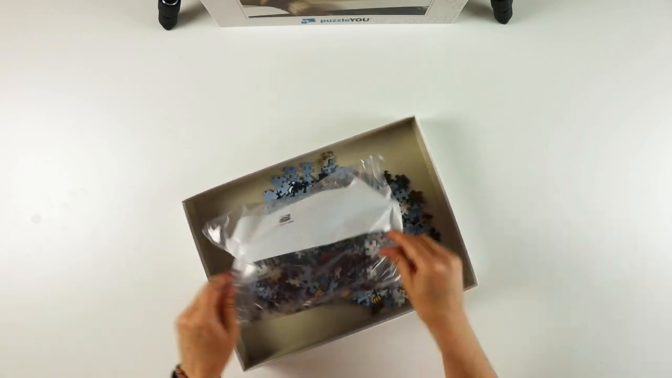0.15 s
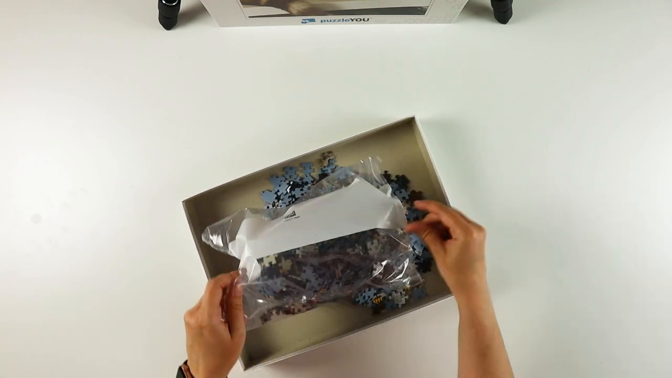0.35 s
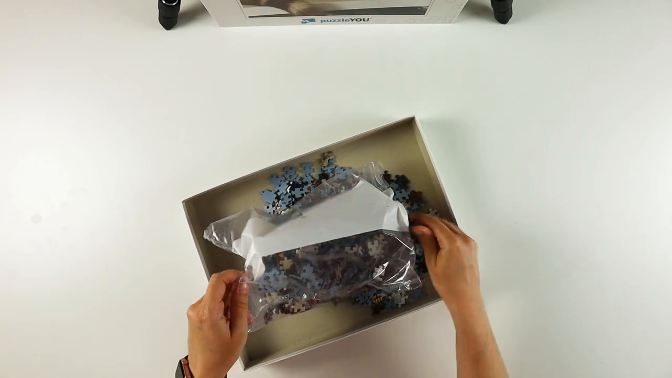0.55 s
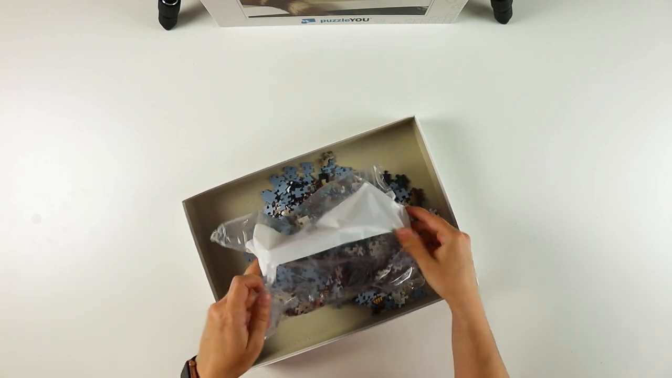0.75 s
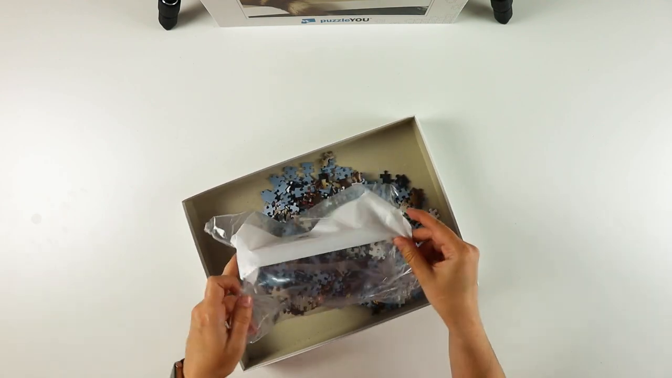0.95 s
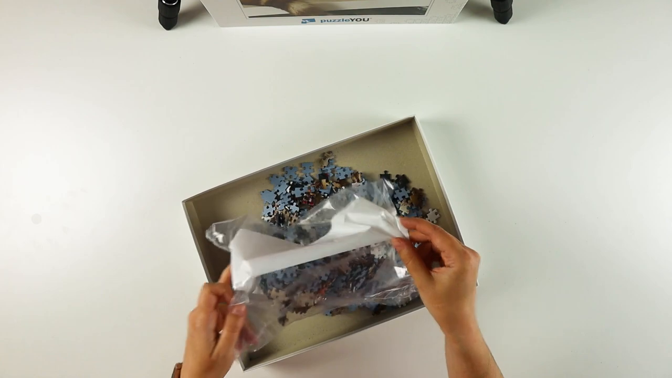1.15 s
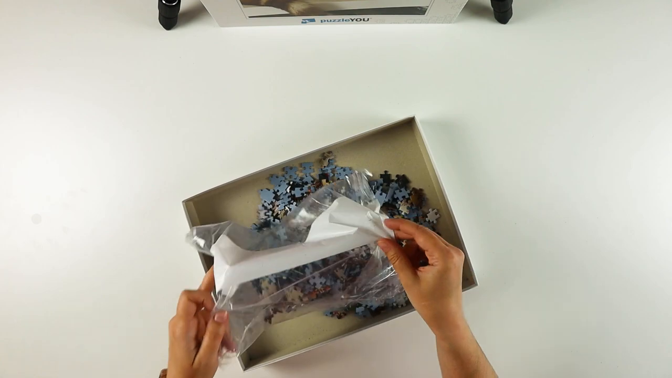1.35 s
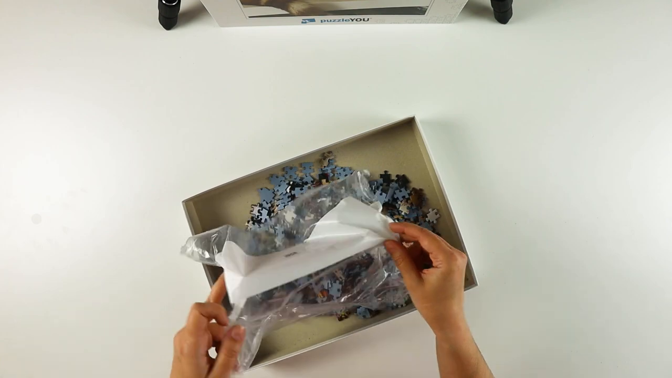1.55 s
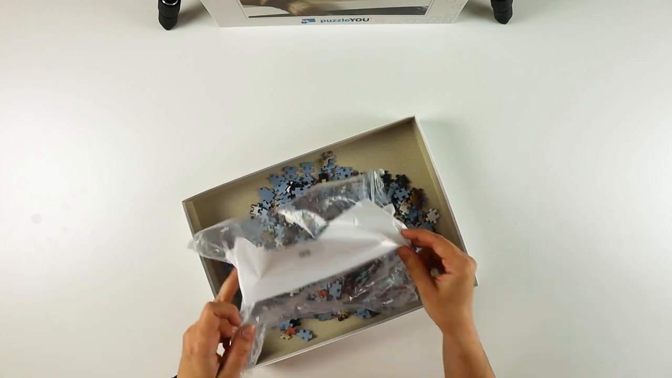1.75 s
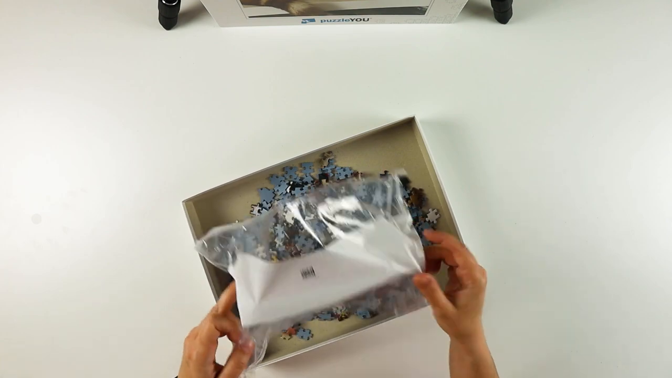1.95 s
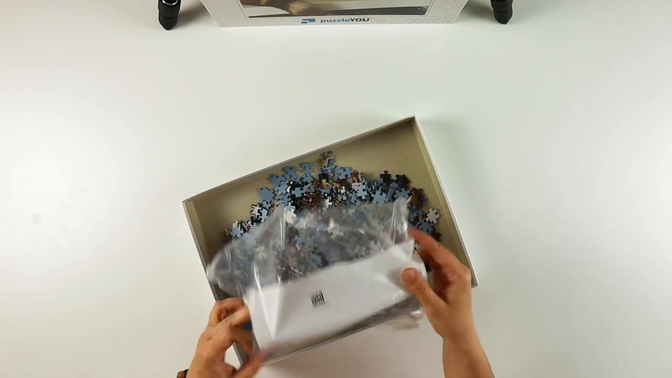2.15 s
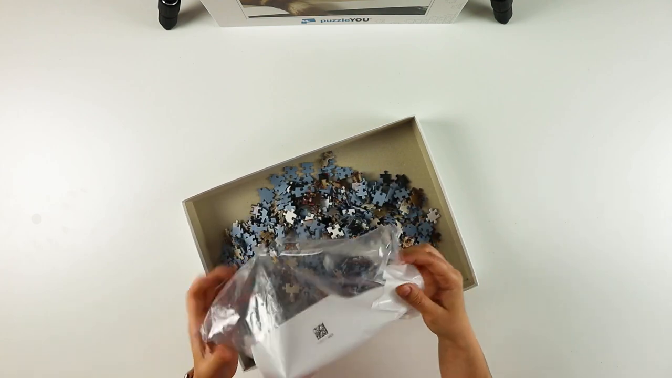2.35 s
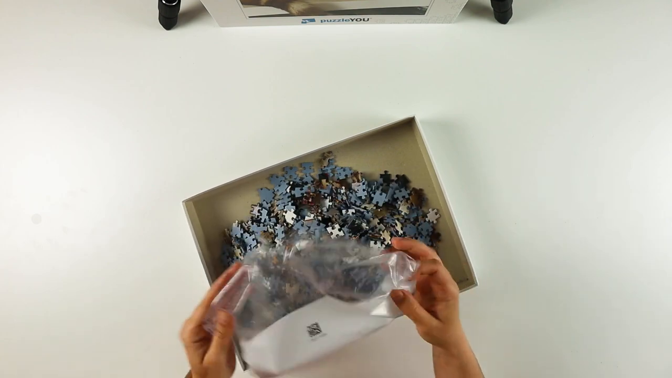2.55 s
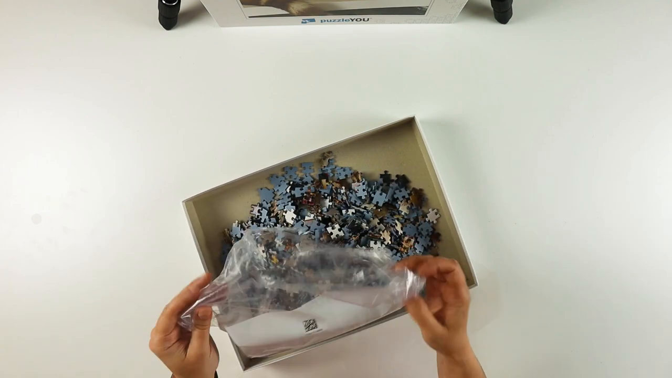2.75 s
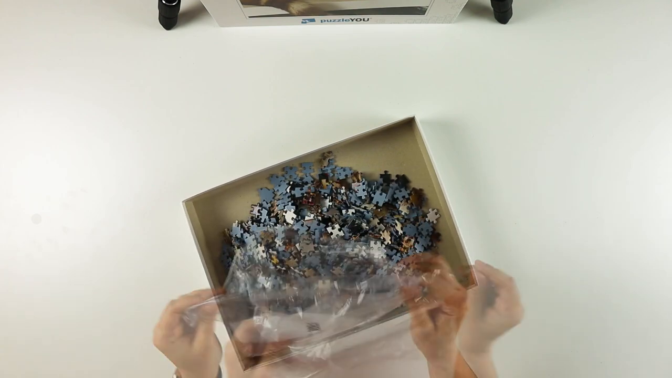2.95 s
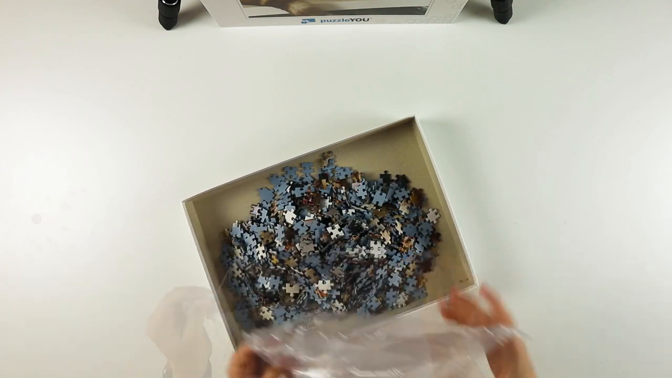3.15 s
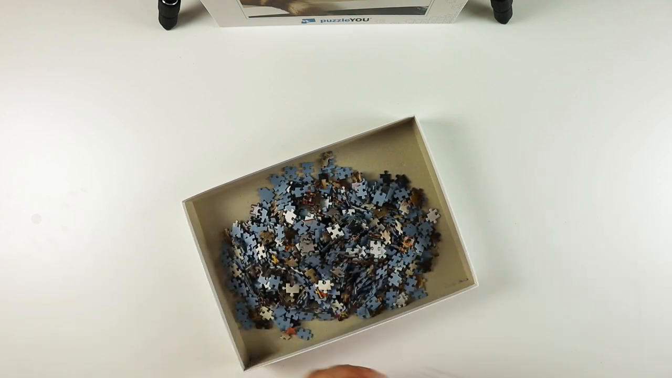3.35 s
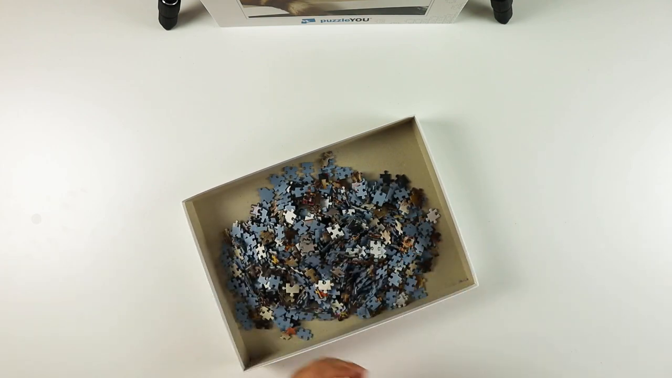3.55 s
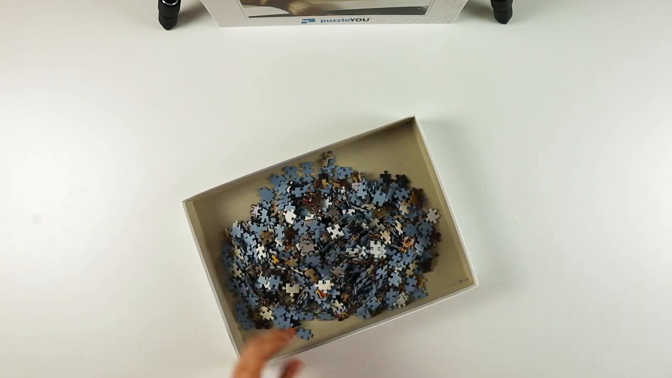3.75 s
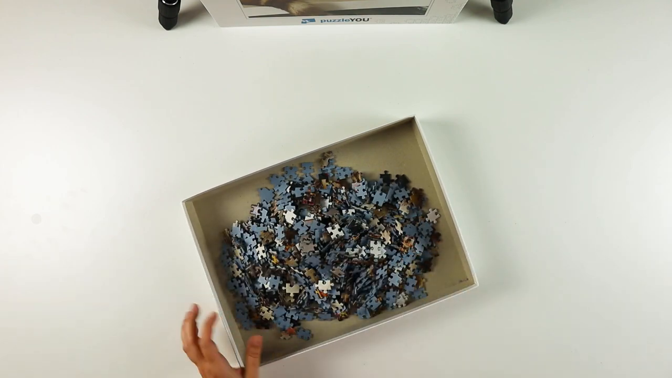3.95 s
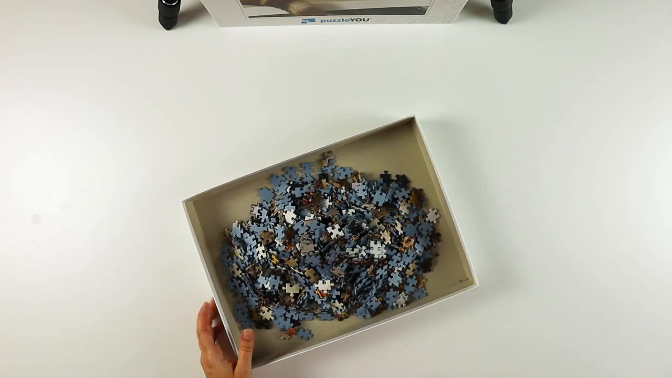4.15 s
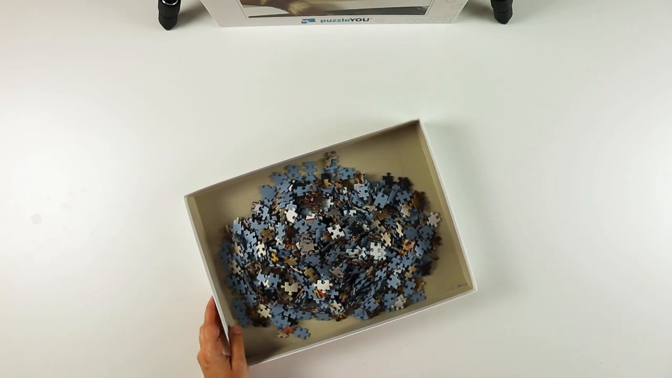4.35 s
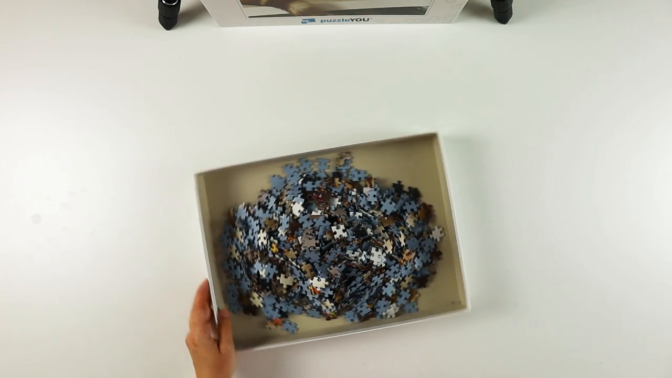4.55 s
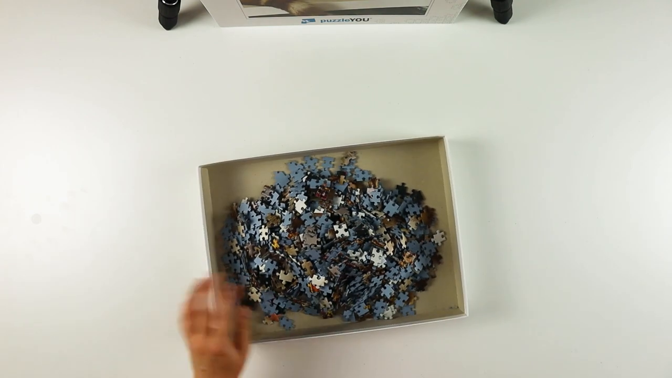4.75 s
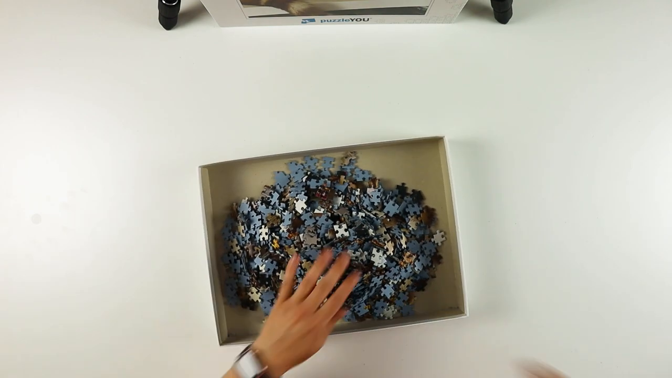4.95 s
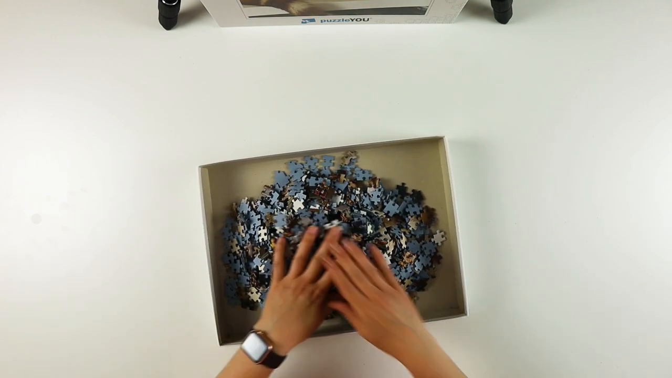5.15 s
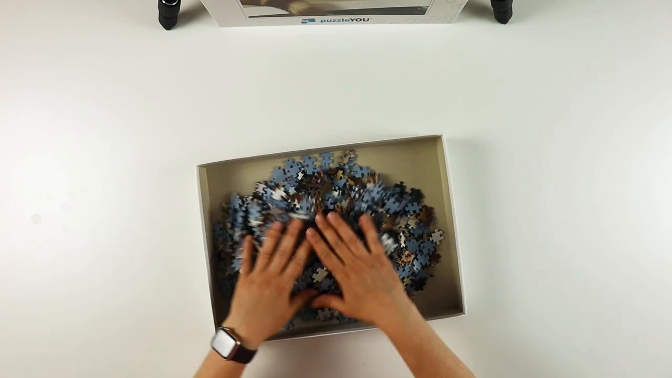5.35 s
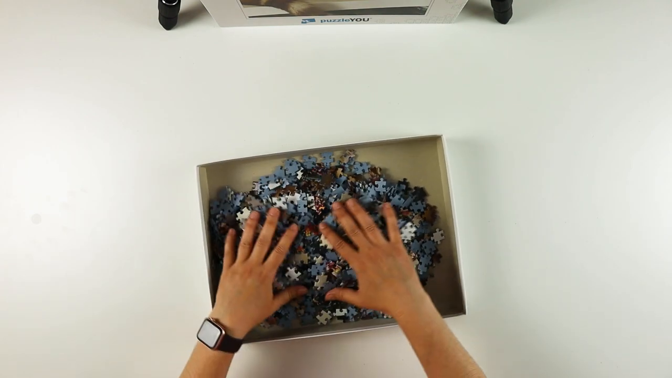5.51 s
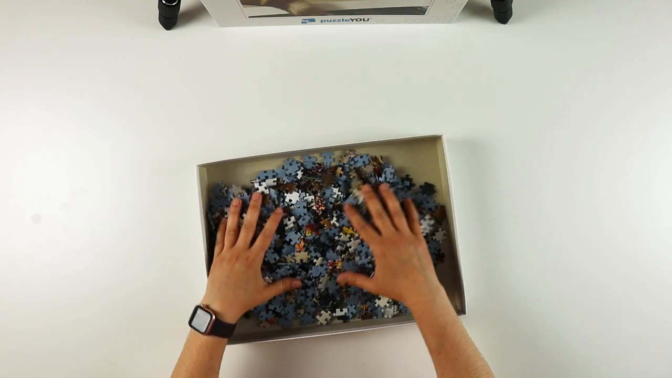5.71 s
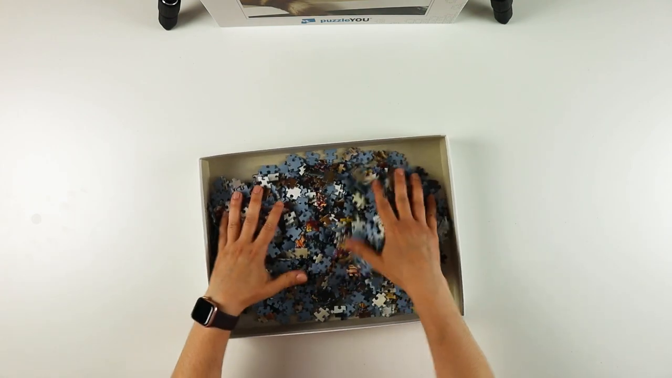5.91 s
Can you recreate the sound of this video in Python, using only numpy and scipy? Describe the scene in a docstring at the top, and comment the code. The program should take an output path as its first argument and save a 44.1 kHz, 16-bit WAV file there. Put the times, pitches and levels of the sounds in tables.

```python
"""Cardboard puzzle pieces are shaken out of a plastic bag into their box on a table, in a small room.
The empty bag is crumpled and put aside, a hand nudges the box and slides it round, then both hands
spread the heap over the drumming box floor. Pieces are dense clouds of tiny rings with ringing landings
on top, film is coloured crackle with separate snaps, and the box is a bank of resonances."""
import sys
import numpy as np
from scipy import signal
from scipy.fft import rfft, irfft, next_fast_len
from scipy.io import wavfile

SR = 44100
rng = np.random.default_rng(int(sys.argv[2]) if len(sys.argv) > 2 else 0)


def digitize_waveform(pressure):
    """Quantize a signal to 16-bit integers and store it at the path in sys.argv[1].

    Rows of a 2-D input are taken as channels; values are limited to [-1, 1].
    """
    field = np.atleast_2d(pressure).T
    bounded = np.clip(field, -1, 1)
    quanta = np.round(bounded * 32767).astype(np.int16)
    wavfile.write(sys.argv[1], SR, quanta)


N = 263661  # samples, about 6 s

# Levels in these tables are taken before the trim of each layer in the mix.

# The box is nudged, then slid round on the table. Each row: time in seconds, scrape level in dB.
SLIDE_SPEED = [(4.05, -55), (4.33, -59), (4.36, -49.5), (4.58, -47), (4.63, -28.5), (4.77, -30), (4.9, -57),
               (4.96, -82)]
# Hands spread the heap. Each row: time in seconds, clatter level in dB, pressure on the box floor in dB,
# scraping on the box floor in dB.
SPREAD_MOVES = [(5.168, -58, -53, -70), (5.176, -38, -47, -57), (5.194, -31, -35.5, -42),
                (5.324, -31.5, -25.5, -36), (5.356, -26.5, -22.5, -34), (5.504, -19.5, -25.5, -20.5),
                (5.52, -25.5, -30, -18.5), (5.652, -32, -29.5, -21), (5.822, -26, -27, -28),
                (5.902, -26.5, -30, -23), (5.96, -30.5, -29.5, -29)]
# The biggest creases of the film snap through. Each row: time in seconds, peak in dB, treble lift in dB.
BIG_SNAPS = [(0.1623, -10.5, 6), (0.2496, -11.5, -7), (0.3263, -24, 8), (0.4872, -17, 3),
             (0.5747, -14.5, -7), (0.6386, -15, 5), (0.7426, -15.5, -3), (0.831, -17.5, 3),
             (0.906, -13.5, 8), (0.9392, -15, 8), (1.0077, -9.5, -0.5), (1.2028, -10.5, 10),
             (1.213, -10.5, 2), (1.3124, -14.5, -1), (1.3798, -11, 8), (1.859, -14.5, 6),
             (2.0814, -26.5, -3), (2.3174, -16, 20), (2.3326, -4.5, -0.5), (2.3593, -12, -7),
             (2.5025, -22.5, -1), (2.638, -12, -4), (2.7034, -10, -15), (2.7363, -9, 5), (2.7938, -4.5, -6),
             (3.0869, -12, 10), (3.092, -13, 12), (3.1473, -16, 0), (3.1569, -13, 9), (3.3158, -23.5, -1),
             (3.3747, -13, 3), (3.4032, -11, -3), (3.4474, -6, -10), (3.489, -11, 2), (3.6638, -30.5, -8),
             (3.7836, -30, -11), (3.8172, -27.5, -1), (3.9496, -33, -14), (4.0707, -24.5, 3),
             (4.1704, -24.5, 0), (4.389, -27.5, -22)]
# The hardest landings of one piece on another. Each row: time in seconds, peak in dB,
# tick over the ring in dB, ring pitch in Hz.
HARD_LANDINGS = [(0.0095, -9, -7, 2650), (0.2162, -13.5, -6, 4800), (0.33, -9.5, -1, 2510),
                 (0.4007, -14.5, 3, 3380), (0.7151, -14.5, -10, 2860), (0.7653, -15.5, -25, 3290),
                 (0.876, -12, -8, 2290), (0.8837, -8, -18, 4430), (0.9676, -7.5, -14.5, 3300),
                 (1.3141, -10, -4.5, 4500), (1.5477, -10, -10, 4520), (1.5652, -7.5, -16, 3860),
                 (1.5726, -7, -20, 3370), (1.5793, -4.5, -8, 3480), (1.6442, -6, -17, 3600),
                 (1.6496, -5.5, -11, 3730), (1.6676, -6.5, -29, 3480), (1.7201, -6.5, -17, 3800),
                 (1.773, -11, -11, 3650), (4.7637, -12, -3, 4080), (5.1947, -14, 5, 3620),
                 (5.2642, -12, -4, 3700), (5.4389, -20, -2, 4260), (5.4476, -14, -9, 4530),
                 (5.5253, -1.5, -27, 2250), (5.6108, -15.5, 8, 5450), (5.8148, -4.5, -5.5, 4820),
                 (5.8949, -9.5, -10, 3800)]
# Knocks on the box. Each row: time in seconds, peak in dB, most excited frequency in Hz.
BOX_KNOCKS = [(0.87, -19, 1140), (0.883, -16, 1100), (1.312, -19.5, 1780), (1.393, -26, 713),
              (1.572, -14, 1230), (1.692, -13, 1230), (1.734, -15.5, 1070), (1.78, -22, 1090),
              (1.823, -16, 1050), (4.052, -35.5, 171), (4.068, -40.5, 253), (4.191, -38, 170),
              (5.403, -14, 1010), (5.524, -13.5, 730), (5.587, -5.5, 1200), (5.845, -16.5, 1410),
              (5.973, -5, 1110)]
# Modes of the box. Each row: frequency in Hz, width in Hz, relative level in dB.
BOX_MODES = [(149, 33, 1.5), (236, 20, -2), (320, 16.6, 3.5), (418.8, 4.3, 10.5), (497, 16, -3.5),
             (703, 12.8, 3.5), (1035, 39, -4), (1100, 21, -4), (1170, 21, -5), (1238, 40, -8.5),
             (1424, 25, -4.5), (1780, 27, 0.5), (2210, 170, -5.5)]
# Modes of the box floor drumming on the table. Each row: frequency in Hz, width in Hz, relative level in dB.
DRUM_MODES = [(33.3, 13, -9), (77.6, 6.8, 2.5), (140, 38, -7), (199, 60, -12.5), (321, 29, -9)]

# Spectra of the tumbling pieces, the rustling film, the film laid aside, a sharp crease, the box bottom
# on the table, the heap under the hands and the room air.
# Each row: frequency in Hz, relative level in dB per Hz.
TUMBLE_SPECTRUM = [(25, -10), (60, 0.5), (135, -2), (220, 0), (410, 2), (750, 1), (1400, 3), (2700, 1.5),
                   (3400, -0.5), (4600, -3), (6800, -14), (16000, -36)]
FILM_SPECTRUM = [(40, -18), (80, -6), (190, -6), (320, 1.5), (450, 4), (700, -3), (1900, 1), (3200, -1.5),
                 (4400, -2), (6600, -13), (16000, -28.5)]
FAR_FILM_SPECTRUM = [(100, -8), (250, -6), (1300, -3.5), (3000, -5), (4500, -2.5), (7000, -11),
                     (16000, -32.5)]
CREASE_SPECTRUM = [(200, -13.5), (1200, 0), (2800, -6), (4600, 5), (6500, -3.5), (10000, -8), (16000, -17)]
SCRAPE_SPECTRUM = [(30, -18), (80, -5), (160, 1.5), (420, -3), (600, -4), (1100, -2.5), (3000, -7.5),
                   (4600, -6), (7000, -16.5), (16000, -28)]
HEAP_SPECTRUM = [(100, -26), (200, 2), (350, -2.5), (600, -5.5), (1300, -6.5), (2200, -6), (3000, -8),
                 (4600, -6.5), (6300, -14.5), (7800, -15), (8600, -15), (9800, -21), (13000, -24),
                 (16000, -30)]
AIR_SPECTRUM = [(25, -5.5), (45, -2), (85, -5.5), (135, -3.5), (185, -6), (225, -4), (290, -15.5),
                (1200, -15), (2300, -22), (4300, -18.5), (7000, -31), (16000, -33)]
# Decay of the room. Each row: frequency in Hz, time to fall by 60 dB in seconds.
ROOM_DECAY = [(150, 0.45), (1000, 0.27), (4500, 0.084), (14000, 0.084)]

# Each shake of the bag lets a batch of pieces slump out. Each row: start in seconds, length in seconds,
# clatter level in dB, film crinkle level in dB.
BAG_SHAKES = [(0.0, 0.011, -27.5, -32), (0.122, 0.18, -27.5, -37.5), (0.4, 0.084, -29.5, -41),
              (0.57, 0.035, -36, -39), (0.706, 0.13, -33.5, -43), (0.865, 0.031, -20.5, -42),
              (0.958, .05, -30.5, -34.5), (1.085, 0.085, -31, -38), (1.182, 0.027, -24, -49),
              (1.383, 0.063, -27.5, -55), (1.532, 0.34, -27.5, -59), (2.082, 0.0082, -44, -62)]
# Between shakes pieces keep trickling until the bag is empty. Each row: time in seconds, clatter level in dB.
PIECE_TRICKLE = [(0, -29.5), (.68, -40), (1.25, -32.5), (1.87, -36), (2.0, -52), (2.25, -50.5), (2.3, -85)]
# Each squeeze crumples the empty bag. Each row: start in seconds, length in seconds, rustle level in dB,
# swell over the length in dB, crinkle level in dB.
BAG_SQUEEZES = [(2.244, 0.14, -32, 0.5, -46), (2.488, 0.072, -32.5, 0, -57),
                (2.583, 0.22, -31.5, 10.5, -43), (2.872, 0.085, -36.5, -1, -47.5),
                (3.023, 0.067, -20.5, -1, -29), (3.105, 0.087, -28, 1, -31.5), (3.32, .14, -28, 5.5, -32.5),
                (3.482, 0.074, -35, -4.5, -42)]
# The bag, laid aside, unfolds in fits. Each row: start in seconds, length in seconds, rustle level in dB,
# swell over the length in dB.
BAG_UNFOLDS = [(3.66, 0.1, -46, 12.5), (3.815, 0.022, -42, -1), (3.948, 0.036, -50.5, -1),
               (4.068, 0.024, -37.5, -0.5), (4.168, 0.032, -41.5, 0), (4.24, 0.059, -50, 1.5),
               (4.37, 0.03, -44.5, 2.5)]

SHAKE_ATTACK_S, SHAKE_FALL_DB_PER_S = 0.0081, 202
SQUEEZE_ATTACK_S, SQUEEZE_FALL_DB_PER_S = 0.025, 237
UNFOLD_ATTACK_S, UNFOLD_FALL_DB_PER_S = 0.003, 223
# lesser creases snap by chance: their rate, peak over the crinkle, scatter and treble lift
SMALL_SNAPS_PER_S, SMALL_SNAP_DB, SMALL_SNAP_SPREAD_DB, SMALL_SNAP_TREBLE_DB = 30, 14.5, 3, -1.5
# the last pieces pelt the heap: start, length and rate; then the peak, scatter, tick and ring of the landings
PELT_START_S, PELT_LENGTH_S, PELTS_PER_S = 1.56, .21, 120
PELT_DB, PELT_SPREAD_DB, PELT_TICK_DB, PELT_HZ = -15.5, 0.5, -20, 3800
# pieces flicked over by the fingers: their rate, peak over the clatter, scatter, tick and central ring
FLICKS_PER_S, FLICK_DB, FLICK_SPREAD_DB, FLICK_TICK_DB, FLICK_HZ = 22, 5.5, 3.5, -5, 3830
PITCH_SCATTER = 0.093  # share by which the ring of a lesser landing differs from piece to piece
TOP_HZ = 16000


def amp(db):
    """Decibels to gain."""
    return 10 ** (np.asarray(db) / 20)


def unit(x):
    """Scale to rms 1."""
    return x / np.sqrt(np.mean(x ** 2) + 1e-20)


def along(points, hz):
    """Read (Hz, value) points on a log frequency axis."""
    f, v = np.transpose(points)
    return np.interp(np.log(hz + 1), np.log(f + 1), v)


def gains(rows):
    """A gain per sample for each dB column, near silent before the first row and held after the last."""
    s, *columns = np.transpose(rows)
    return [amp(np.interp(np.arange(N) / SR, s, column, left=-120)) for column in columns]


def filtered(x, response):
    """Shape x by a complex response of frequency, with padding for the ringing."""
    m = 2 * next_fast_len(len(x) // 2 + 4096)
    return irfft(rfft(x, m) * response(np.fft.rfftfreq(m, 1 / SR)), m)[:len(x)]


def causal(gain):
    """The minimum-phase response with this gain: it rings only after a blow."""
    cepstrum = irfft(np.log(np.maximum(gain, 1e-6)))
    half = len(cepstrum) // 2
    cepstrum[1:half] *= 2
    cepstrum[half + 1:] = 0
    return np.exp(rfft(cepstrum))


def coloured(x, spectrum):
    """Colour x with a spectrum, at rms 1."""
    return unit(filtered(x, lambda hz: causal(amp(along(spectrum, hz)))))


def resonate(x, modes):
    """Pass x through a set of resonances of alternating sign, at rms 1."""
    def response(f):
        total = 0
        for k, (centre, width, db) in enumerate(modes):
            band = 1j * f * width
            total = total + (-1) ** k * amp(db) * band / (centre * centre - f * f + band)
        return total
    return unit(filtered(x, response))


def box(x, centre_hz, focus_db, damping=1):
    """The box rings most near centre_hz; focus_db is the loss an octave away, damping widens its modes."""
    return resonate(x, [(hz, width * damping, db - focus_db * abs(np.log2(hz / centre_hz)))
                        for hz, width, db in BOX_MODES])


def add(track, s, sound, db):
    """Place a sound at time s, its six tallest samples averaging db."""
    part = track[max(round(s * SR), 0):][:len(sound)]
    crest = np.sort(np.abs(sound))[-6:].mean()
    part += amp(db) * sound[:len(part)] / crest


def bursts(rate, spread_db, t60):
    """An envelope that jumps at random moments by random amounts and dies away, at rms 1."""
    chance, size = rng.random(N), rng.standard_normal(N)
    energy = (chance < rate / SR) * amp(spread_db * np.clip(size, -2, 2)) ** 2
    decay = amp(-60 / (t60 * SR)) ** 2
    return unit(np.sqrt(signal.lfilter([1], [1, -decay], energy)))


def surges(share, rate, spread_db, t60):
    """A steady envelope in which bursts carry this share of the power."""
    return np.sqrt(1 - share + share * bursts(rate, spread_db, t60) ** 2)


def crackle(rate, spread_db, t60):
    """White noise bursts of random sizes, at rms 1."""
    return bursts(rate, spread_db, t60) * rng.standard_normal(N)


def clatter(rate, spread_db, ring, rub_db):
    """Dense cardboard contacts, each ringing briefly at eight pitches of its own; white overall."""
    draw = rng.random((int(rate * N / SR), 10))
    t = np.arange(200) / SR
    size = amp(-spread_db * np.log(np.maximum(draw[:, 1:2], .05)))
    # one random pitch in each 1900 Hz band
    hz = 700 + 1900 * (np.arange(8) + draw[:, 2:])[..., None]
    sign = (-1) ** np.arange(8)[:, None]
    rings = np.exp(-t / ring) * np.sin(2 * np.pi * hz * t) * sign
    where = (draw[:, :1] * N).astype(int) + np.arange(len(t))
    grains = unit(np.bincount(where.ravel(), (size * rings.sum(1)).ravel(), N)[:N])
    # between contacts the rough faces rub on each other
    return grains + amp(rub_db) * crackle(2 * rate, spread_db, t60=0.017)


def strokes(rows, attack_s, fall_db_per_s):
    """The gain of (s, length s, dB, swell dB) movements: each starts quickly, holds or swells, then dies away."""
    power = np.zeros(N)
    for s, length, db, swell_db in rows:
        age = np.arange(N) / SR - s
        level = db + swell_db * np.clip(age / length, 0, 1) - fall_db_per_s * np.maximum(age - length, 0)
        power += (np.clip(age / attack_s, 0, 1) * amp(level)) ** 2
    return np.sqrt(power)


def scattered(gain, rate, over_db, spread_db):
    """Chance contacts while something moves, their peaks following its gain: rows (s, peak dB)."""
    slots = np.arange(int(rate * N / SR))
    draw = rng.random((len(slots), 2))
    times = (slots + draw[:, 0]) / rate
    # an even scatter with spread_db as its standard deviation
    scatter_db = spread_db * np.sqrt(3) * (2 * draw[:, 1] - 1)
    peaks = gain[(times * SR).astype(int)] * amp(over_db + scatter_db)
    return [(s, 20 * np.log10(peak)) for s, peak in zip(times, peaks) if peak > .003]


def air():
    """The quiet air of the room is steady coloured noise."""
    return amp(-58.0) * coloured(rng.standard_normal(N), AIR_SPECTRUM)


def room(x):
    """The walls answer after 5 ms with a short noise tail, dying fastest in the treble."""
    hz, t, z = signal.stft(rng.standard_normal(SR // 2), SR, nperseg=256)
    decay = amp(-60 * t / along(ROOM_DECAY, hz)[:, None])
    tail = signal.istft(z * decay, SR, nperseg=256)[1]
    return signal.fftconvolve(np.pad(x, (SR // 200, 0)), tail / np.linalg.norm(tail))[:N]


def slide():
    """The box bottom sticks and slips over the table, damped by the hand that holds it."""
    speed, = gains(SLIDE_SPEED)
    s = np.arange(N) / SR
    rub = coloured(crackle(rate=2800, spread_db=0.5, t60=0.0073), SCRAPE_SPECTRUM)
    # as the box turns, the rubbing spot moves and wakes lower modes
    turned = np.interp(s, [4.68, 4.745], [0, 1])
    judder = crackle(rate=1000, spread_db=3.5, t60=0.0037)
    high = box(judder, centre_hz=835, focus_db=15, damping=2.3)
    low = box(judder, centre_hz=430, focus_db=19, damping=2.9)
    card = np.sqrt(1 - turned) * high + np.sqrt(turned) * low
    # the card groans most in the fast middle of the turn
    groan = amp(-11) + np.exp(-((s - 4.725) / .065) ** 2)
    return speed * (rub + amp(-3.5) * groan * card)


def knocks():
    """Pieces and fingers strike the box; the spot decides which modes answer."""
    track, t = np.zeros(N), np.arange(SR // 5) / SR
    for s, db, hz in BOX_KNOCKS:
        # a short push, then a faint chatter as the piece settles
        push = np.exp(-t * hz / 0.21)
        chatter = 0.053 * np.exp(-t / 0.026) * rng.standard_normal(len(t))
        add(track, s, box(push + chatter, centre_hz=hz, focus_db=24), db)
    return track


def spread(jostle, press, scrape):
    """Pieces jostle under the palms, scrape the box floor and make it drum on the table."""
    # interlocked pieces catch and let go in little jerks
    jerks = surges(.45, rate=110, spread_db=3, t60=.02)
    pieces = coloured(jerks * clatter(rate=1000, spread_db=2.5, ring=0.0011, rub_db=1), HEAP_SPECTRUM)
    drum = resonate(crackle(rate=630, spread_db=0.5, t60=0.009), DRUM_MODES)
    card = box(crackle(rate=580, spread_db=-0.5, t60=0.0037), centre_hz=1197, focus_db=25.5)
    return amp(1.0) * jostle * pieces + press * drum + amp(-3.5) * scrape * card


def squeezing():
    """The rustle and the crinkle gains of the film as the empty bag is crumpled."""
    rustle_rows = [row[:4] for row in BAG_SQUEEZES]
    crinkle_rows = [(s, length, db, swell) for s, length, _, swell, db in BAG_SQUEEZES]
    rustle = strokes(rustle_rows, SQUEEZE_ATTACK_S, SQUEEZE_FALL_DB_PER_S)
    return rustle, strokes(crinkle_rows, SQUEEZE_ATTACK_S, SQUEEZE_FALL_DB_PER_S)


def bag(rustle, crinkle):
    """The film rustles as runs of small creases buckle, with sparser sharp ones on top."""
    settle = strokes(BAG_UNFOLDS, UNFOLD_ATTACK_S, UNFOLD_FALL_DB_PER_S)
    runs = surges(.55, rate=90, spread_db=2, t60=.035)
    body = coloured(runs * clatter(rate=1100, spread_db=2.0, ring=0.0005, rub_db=1.5), FILM_SPECTRUM)
    creases = crackle(rate=530, spread_db=7.5, t60=0.0067) + 0.64 * rng.standard_normal(N)
    sharp = coloured(creases, CREASE_SPECTRUM)
    far = coloured(crackle(rate=1000, spread_db=3.5, t60=0.015), FAR_FILM_SPECTRUM)
    return amp(-1.0) * rustle * body + amp(-0.5) * crinkle * sharp + amp(-2) * settle * far


def snaps(crinkle):
    """A big crease flips with a crack, and the film flaps back a moment later."""
    track, t = np.zeros(N), np.arange(SR // 30) / SR
    small = scattered(crinkle, SMALL_SNAPS_PER_S, SMALL_SNAP_DB, SMALL_SNAP_SPREAD_DB)
    for s, db, treble_db in list(BIG_SNAPS) + [(s, db, SMALL_SNAP_TREBLE_DB) for s, db in small]:
        lag, panel_hz = rng.uniform(.0007, .0016), rng.uniform(1500, 5500)
        flip = np.exp(-t / .0005)
        flap = .5 * (t > lag) * np.exp(-np.abs(t - lag) / .0008)
        crack = (flip + flap + 0.097 * np.exp(-t / 0.005)) * rng.standard_normal(len(t))

        def response(hz):
            # tighter creases crack brighter, and each panel of film has its own pitch
            shelf_db = treble_db / (1 + (6000 / (hz + 1)) ** 6)
            panel_db = 6 / (1 + ((hz - panel_hz) / 600) ** 2)
            return causal(amp(along(CREASE_SPECTRUM, hz) + shelf_db + panel_db))
        add(track, s, filtered(crack, response), db)
    return track


def landings(jostle):
    """Lesser landings, as the last pieces pelt the heap and as fingers flick them: (s, dB, tick dB, Hz)."""
    age = np.arange(N) / SR - PELT_START_S
    pelting = (age > 0) & (age < PELT_LENGTH_S)
    pelts = scattered(pelting, PELTS_PER_S, PELT_DB, PELT_SPREAD_DB)
    flicks = scattered(jostle, FLICKS_PER_S, FLICK_DB, FLICK_SPREAD_DB)
    rows = [(s, db, PELT_TICK_DB, PELT_HZ) for s, db in pelts]
    rows += [(s, db, FLICK_TICK_DB, FLICK_HZ) for s, db in flicks]
    return [(s, db, tick_db, hz * np.exp(rng.normal(0, PITCH_SCATTER))) for s, db, tick_db, hz in rows]


def clacks(jostle):
    """A stiff piece lands on another: a tick and a few cycles of its bending modes."""
    track, t = np.zeros(N), np.arange(SR // 40) / SR
    bending = [(.45, -10.5), (.87, -12), (1, 3.5), (1.2, -4)]  # (share of the ring pitch, dB)
    for s, db, tick_db, hz in list(HARD_LANDINGS) + landings(jostle):
        ring = sum(amp(level + rng.normal(0, 0.58)) * np.sin(2 * np.pi * hz * ratio * t)
                   for ratio, level in bending)
        ring = ring * np.exp(-t / 0.0012) * (1 - np.exp(-t / 0.00024))
        tick_fade = np.exp(-t / 0.0014) + 0.23 * np.exp(-t / 0.0049)
        tick = coloured(rng.standard_normal(len(t)), HEAP_SPECTRUM) * tick_fade
        add(track, s, ring + amp(tick_db) * tick, db)
    return track


def shaking():
    """The flow of pieces and the crinkle of the film as the bag is shaken out."""
    trickle, = gains(PIECE_TRICKLE)
    flow_rows = [(s, length, db, 0) for s, length, db, _ in BAG_SHAKES]
    crinkle_rows = [(s, length, db, 0) for s, length, _, db in BAG_SHAKES]
    flow = strokes(flow_rows, SHAKE_ATTACK_S, SHAKE_FALL_DB_PER_S)
    crinkle = strokes(crinkle_rows, SHAKE_ATTACK_S, SHAKE_FALL_DB_PER_S)
    return np.hypot(flow, trickle), np.hypot(crinkle, amp(-10.5) * trickle)


def pour(flow, crinkle):
    """Pieces slide over the film and tumble on to the heap, stirring the box."""
    # each falling piece sets off a small cascade of contacts
    cascades = surges(.55, rate=80, spread_db=2, t60=.045)
    contacts = cascades * clatter(rate=1000, spread_db=3.0, ring=0.0007, rub_db=-0.5)
    tumble = coloured(contacts, TUMBLE_SPECTRUM)
    stirred = box(contacts, centre_hz=660, focus_db=7.5, damping=0.81)
    pieces = amp(-1.5) * tumble + amp(-12.0) * stirred
    creases = crackle(rate=450, spread_db=6.0, t60=0.0051) + 0.46 * rng.standard_normal(N)
    film = coloured(creases, CREASE_SPECTRUM)
    return flow * pieces + amp(-1) * crinkle * film


def scene():
    """All the handling, its echo and the quiet air of the room."""
    flow, shaken = shaking()
    rustle, squeezed = squeezing()
    jostle, press, scrape = gains(SPREAD_MOVES)
    rustling = pour(flow, shaken) + bag(rustle, squeezed) + slide() + spread(jostle, press, scrape)
    hits = knocks() + snaps(shaken + squeezed) + clacks(jostle)
    echo = room(amp(-14) * rustling + amp(-11) * hits)
    return (rustling + hits + echo + air())[None]


def record(dry):
    """The recorder rounds off the tallest peaks and cuts steeply above its band limit."""
    rounded = dry[0] / (1 + np.abs(dry[0] / .68) ** 6) ** (1 / 6)
    return filtered(rounded, lambda hz: 1 / np.sqrt(1 + (hz / TOP_HZ) ** 160))[None]


dry = scene()
out = record(dry)
digitize_waveform(out)
```